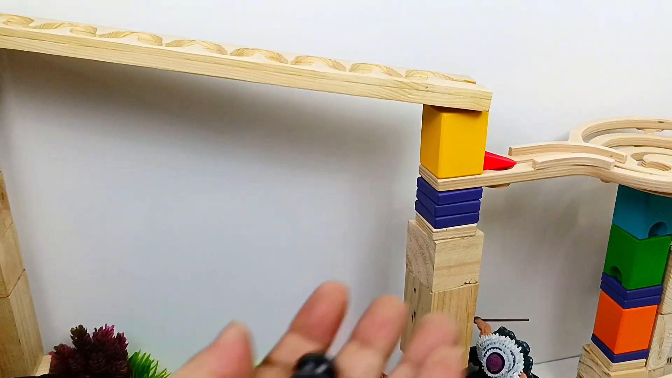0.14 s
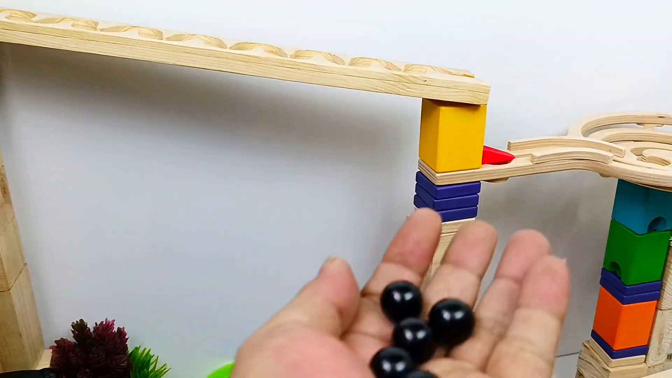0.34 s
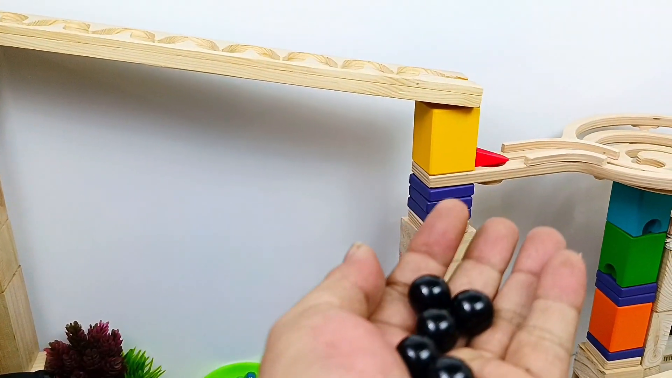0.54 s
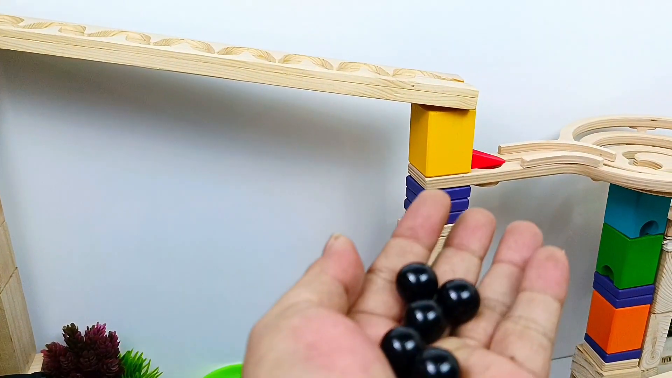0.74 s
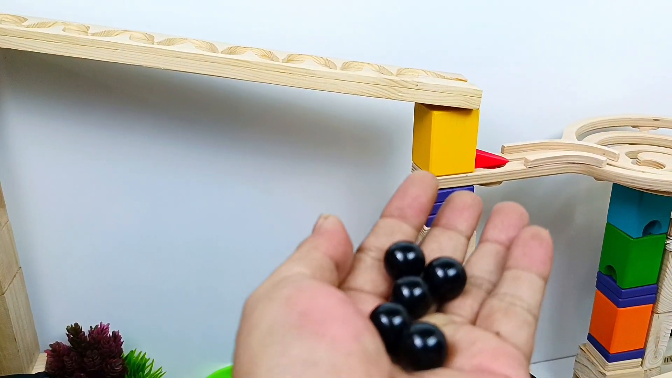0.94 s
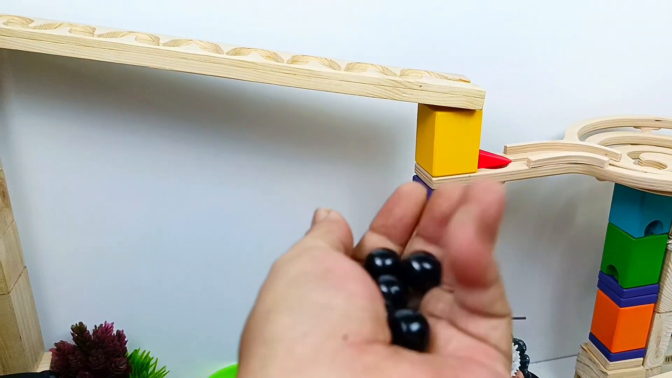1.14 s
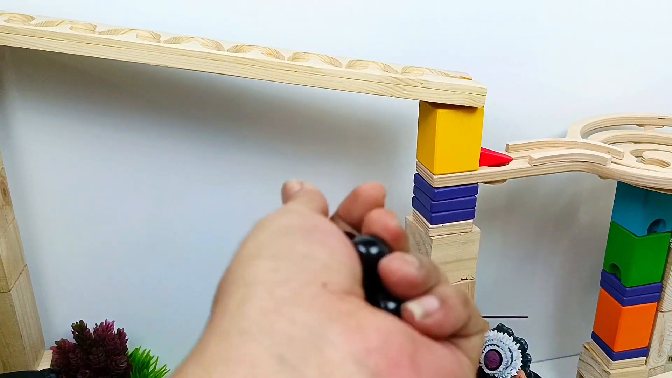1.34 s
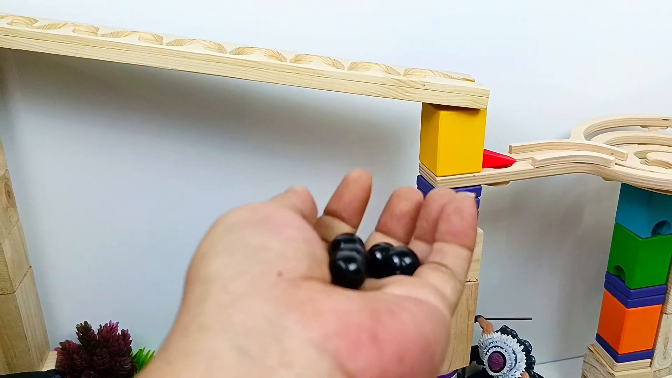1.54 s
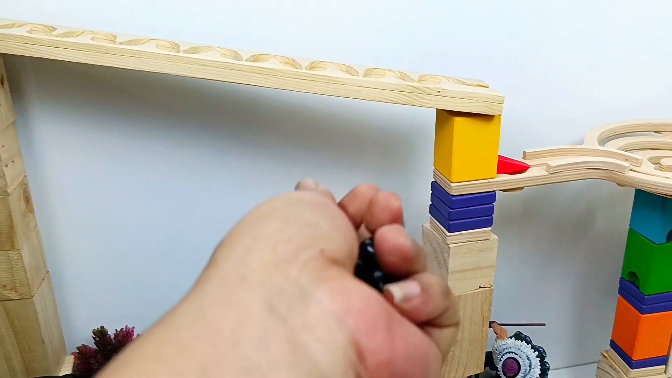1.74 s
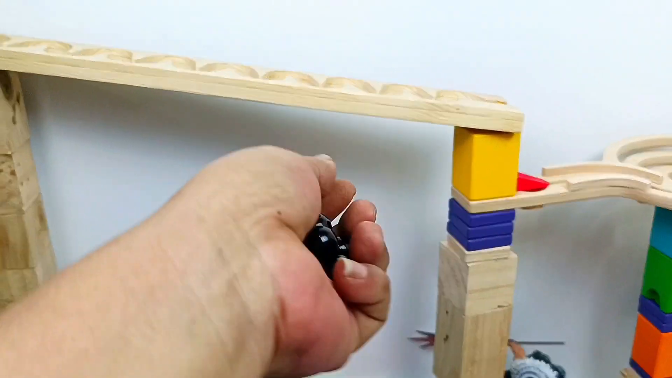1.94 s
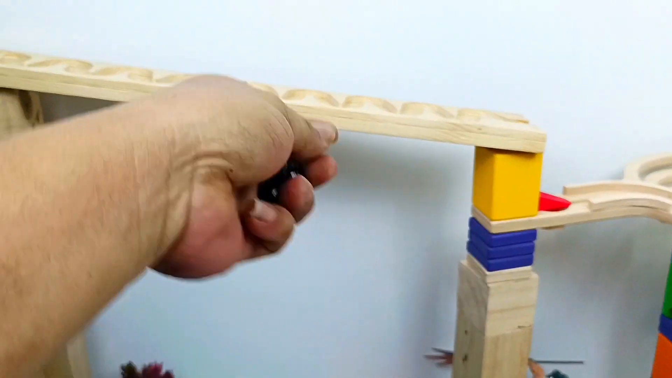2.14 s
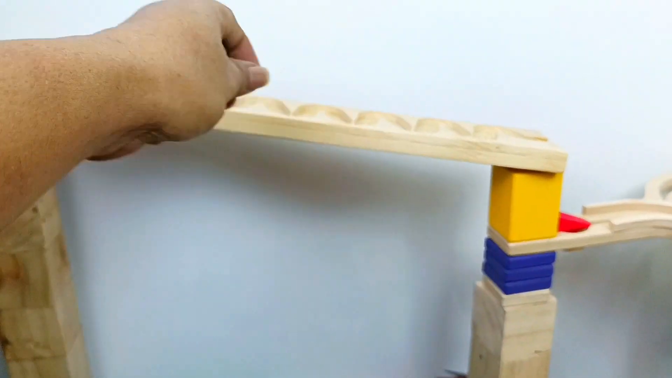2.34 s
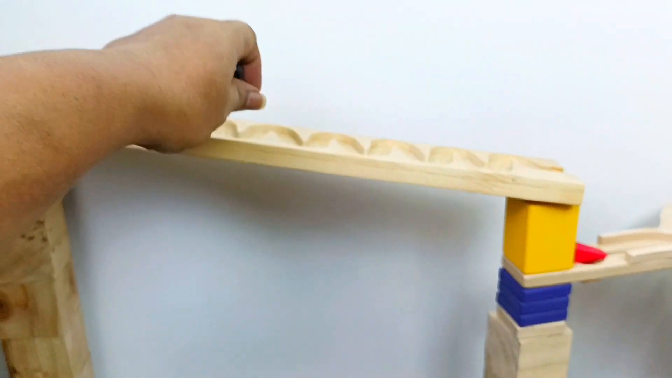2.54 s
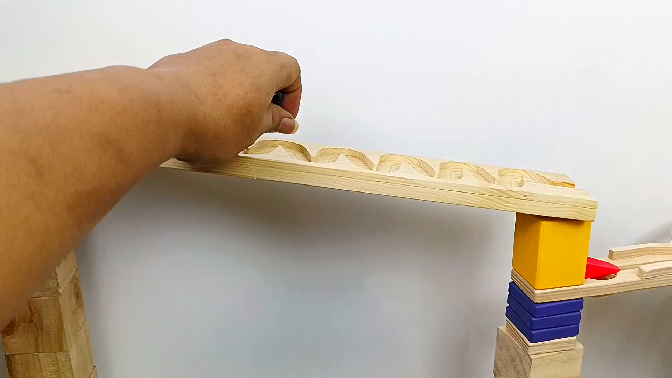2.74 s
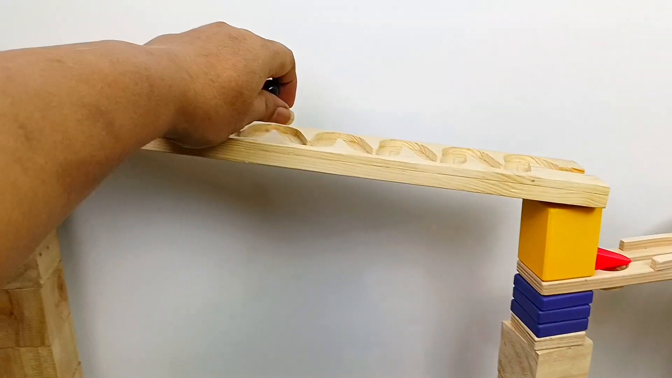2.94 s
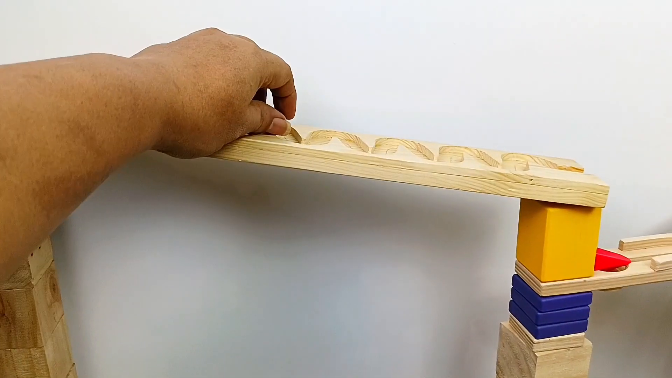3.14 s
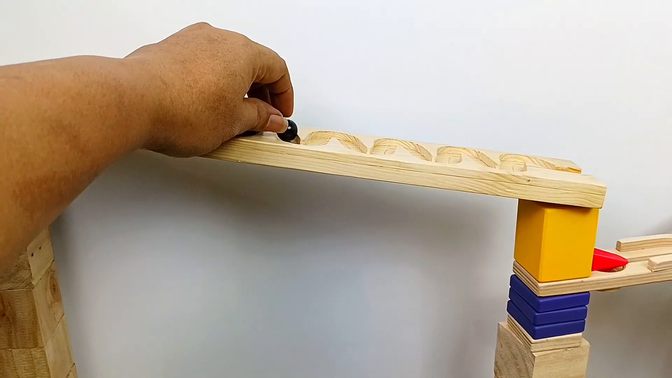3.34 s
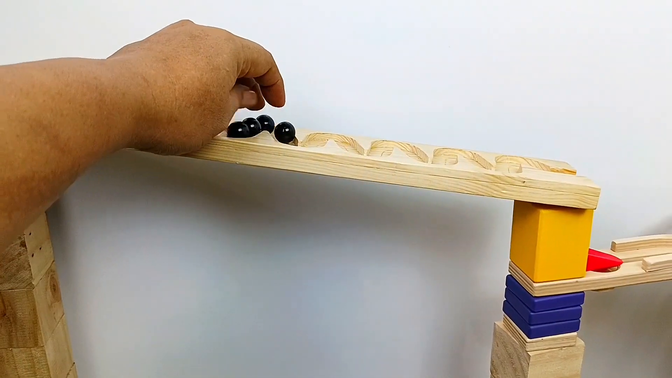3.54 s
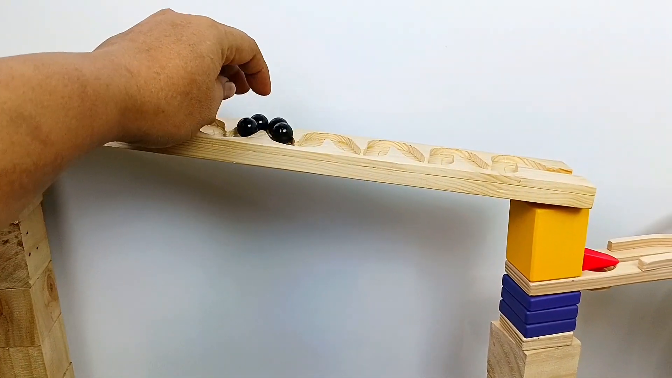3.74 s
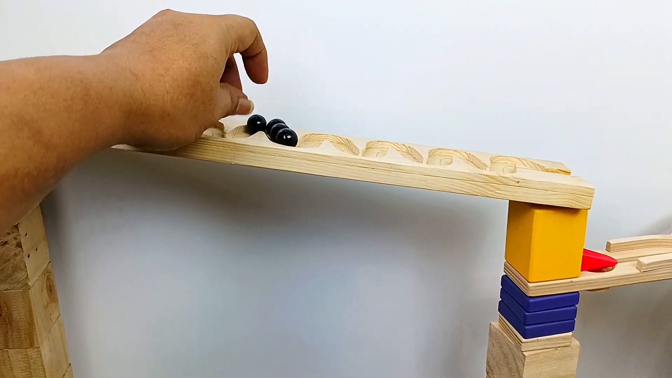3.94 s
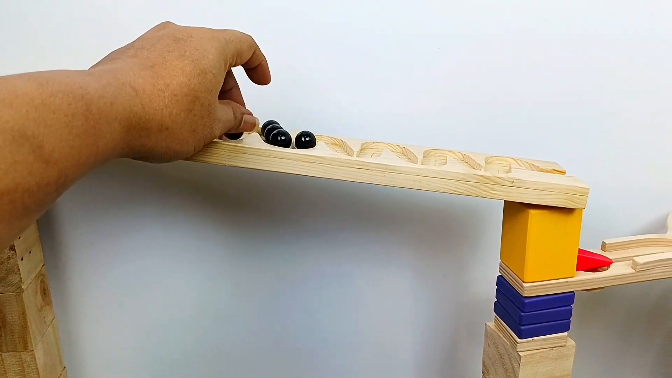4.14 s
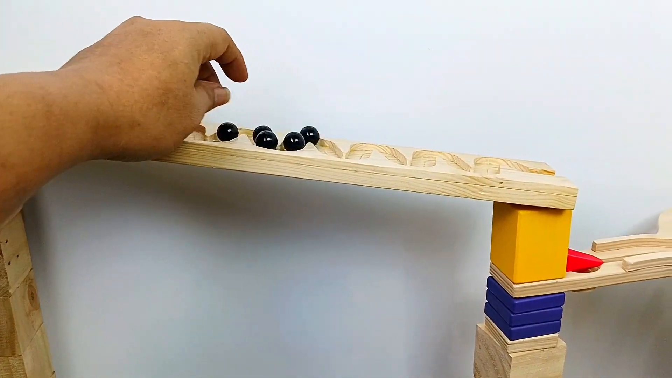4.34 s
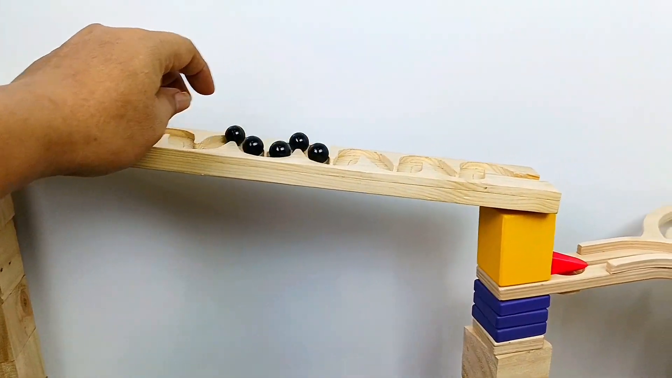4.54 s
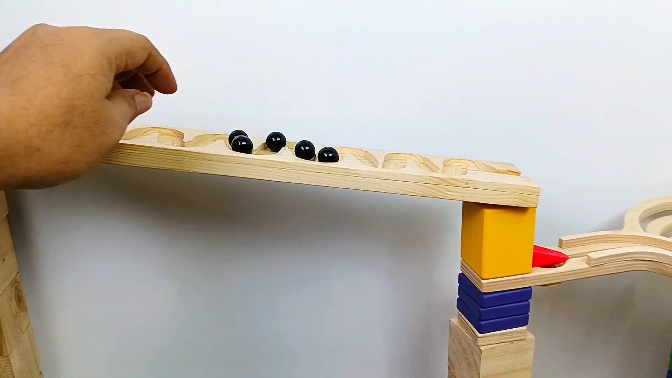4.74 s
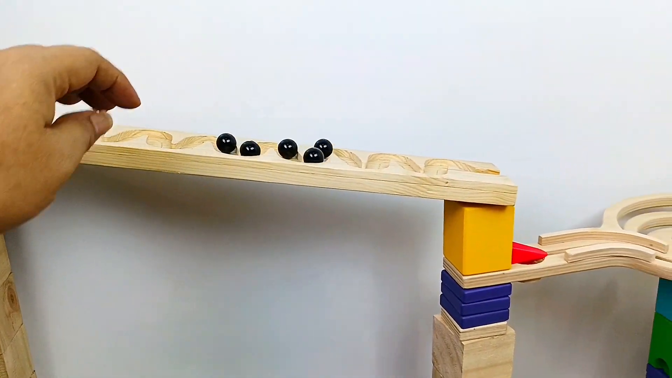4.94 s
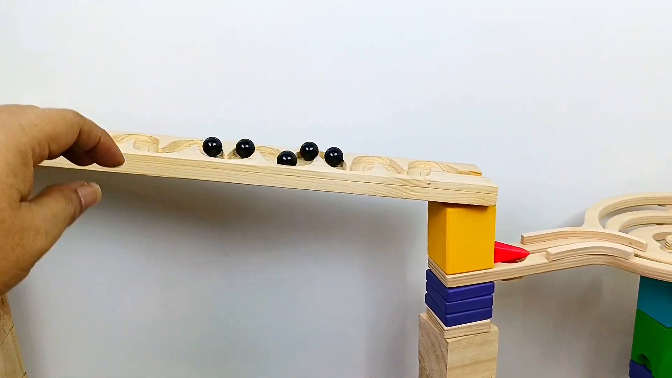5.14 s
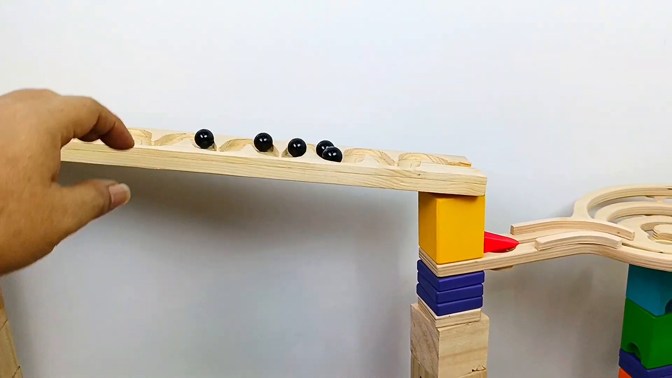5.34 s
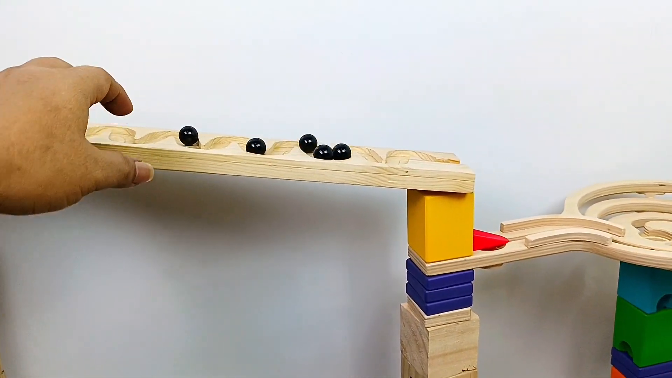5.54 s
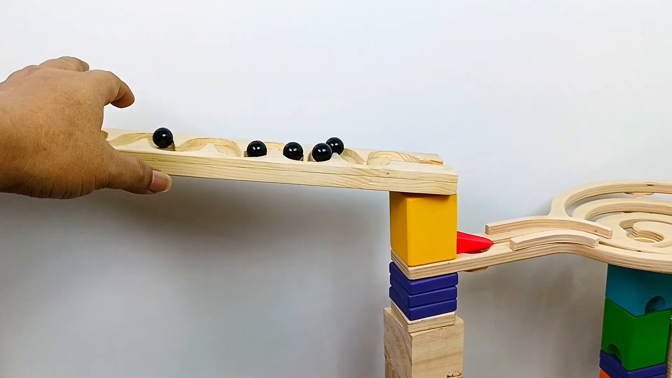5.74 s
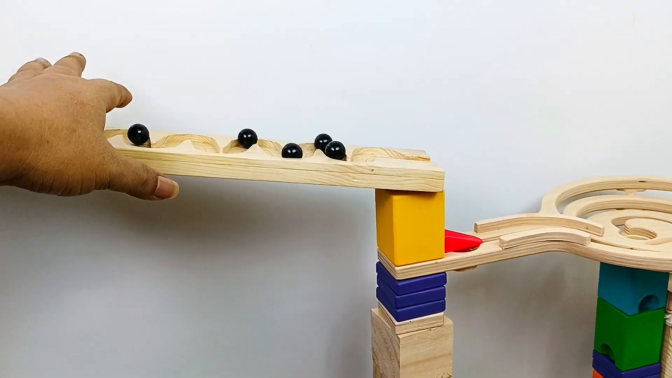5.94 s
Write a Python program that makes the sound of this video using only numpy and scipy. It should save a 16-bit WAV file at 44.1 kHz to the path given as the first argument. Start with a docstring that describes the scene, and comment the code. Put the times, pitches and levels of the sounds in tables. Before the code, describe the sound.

Glass marbles click together in a hand, then clatter onto a wooden ramp and roll slowly down with light knocks.

```python
"""Glass marbles click together in a hand, close by, in a small live room. They are dropped on a wavy
wooden ramp, clatter, and roll slowly down from dip to dip, knocking on the wood and now and then on
each other. A few soft low bumps come near the end. Glass on glass gives a brief bright pulse, coloured
by the hollow around the marbles; glass on wood excites the damped modes of the plank, strongly in a
knock and faintly in rolling. Quiet room noise and a hum lie underneath."""
import sys
import numpy as np
from scipy import signal
from scipy.fft import rfft, irfft
from scipy.io import wavfile
from scipy.ndimage import uniform_filter1d

SR = 44100
rng = np.random.default_rng(int(sys.argv[2]) if len(sys.argv) > 2 else 0)


def transcribe(signal):
    """Save signal, clipped to [-1, 1], as a 16-bit WAV file at the path in sys.argv[1]."""
    frames = np.atleast_2d(signal).T
    limited = np.clip(frames, -1, 1)
    pcm = np.round(limited * 32767).astype(np.int16)
    wavfile.write(sys.argv[1], SR, pcm)


N = 263718
T = np.arange(N) / SR
FFT_SIZE = 4096
HZ = np.fft.rfftfreq(FFT_SIZE, 1 / SR)

# A marble drops into a dip and hops once. Each row: start in seconds, relative level in dB,
# brightness in dB per octave, level of the second landing in dB against the first.
DROPS = [(3.1640, -18.5, 2.5, 0), (3.1965, -21, -2, -3), (3.2383, -19.5, 2, -7.5), (3.2798, -19, 0, -11),
         (3.3175, -23, 1, -5), (3.3805, -22, -3, -19), (3.4255, -25, -1, -3), (3.4759, -20.5, -1, -13),
         (3.5322, -21.5, 3, -4), (3.57, -25.5, -2.5, -0.5), (3.7485, -26.5, 0, -9), (3.9398, -43, -6.5, -4),
         (4.2692, -26.5, 3.5, 2.5), (4.318, -30, 2.5, -7.5), (4.358, -32.5, 2.5, -9), (4.3973, -37, 9, -3),
         (4.5674, -36, 4, -9), (4.6745, -39.5, -1.5, 8), (4.953, -39.5, 13, -2.5), (5.076, -38.5, 5.5, -8),
         (5.2279, -41, 6.5, -11), (5.323, -34, 5, -11.5), (5.422, -43, 12.5, -10), (5.4794, -40.5, 3, -17),
         (5.598, -44.5, 5, 12), (5.8135, -44, 6, -8.5), (5.9243, -46, 4, -15)]
# The fingers close round the marbles, then leave them on the ramp. Each row: time in seconds,
# resonance of the hollow in Hz, its extra strength in dB, share sent into the room in dB.
HOLLOW = [(0, 4280, 0, -11.5), (.52, 4580, 3.5, -10.5), (1.36, 4300, 6, -20), (1.40, 2970, 3, -14),
          (1.49, 3780, 5.5, -3.5), (1.76, 3770, 4, -9.5), (2.12, 4140, 5.5, -6.5), (3.2, 4650, 0, -6),
          (4.85, 5330, -10, -8.5)]


def amp(db):
    """Decibels to amplitude ratio."""
    return 10 ** (np.asarray(db) / 20)


def unit_energy(x):
    """Normalisation to an energy of 1."""
    return x / np.sqrt(np.sum(x ** 2) + 1e-20)


def unit_rms(x):
    """Normalisation to an rms of 1."""
    return x / np.sqrt(np.mean(x ** 2) + 1e-20)


def curve_at(points, hz):
    """Interpolation on a logarithmic frequency axis."""
    point_hz, value = np.transpose(points)
    return np.interp(np.log(hz + 1), np.log(point_hz + 1), value)


def above(hz, order):
    """A high-pass shape: a smooth step from 0 to 1 around hz."""
    return 1 - 1 / (1 + (HZ / hz) ** order)


def add(mix, start_s, sound):
    """Superposition: a sound joins the mix at its start time."""
    part = mix[max(round(start_s * SR), 0):][:len(sound)]
    part += sound[:len(part)]


def minimum_phase(db):
    """Minimum phase gives the sharpest causal pulse with this spectrum, here of energy 1."""
    cepstrum = irfft(np.log(amp(np.maximum(db, -100))))
    cepstrum[1:FFT_SIZE // 2] *= 2
    cepstrum[FFT_SIZE // 2 + 1:] = 0
    return unit_energy(irfft(np.exp(rfft(cepstrum))))


def diffuse_burst(t60, rise_s):
    """Incoherent summation: countless tiny contacts and echoes merge into noise that swells and dies."""
    t = T[:FFT_SIZE * 2]
    return unit_energy(rng.standard_normal(len(t)) * amp(-60 * t / t60) * (1 - np.exp(-t / rise_s)))


def room_noise(side_db=-12, patchy_db=2):
    """Spectrally shaped noise: a steady background that drifts a little in patches of time and pitch."""
    # Each row: frequency in Hz, relative level in dB.
    spectrum = [(30, -45), (55, -15.5), (76, -15), (97, -12.5), (125, -16.5), (160, -15), (200, -10),
                (420, -9), (560, -12), (1100, -14.5), (1500, -7.5), (2300, -10.5), (3700, -24.5),
                (5600, -35.5), (8000, -34), (10500, -42.5), (13000, -46), (16000, -48)]
    # Each row: time in seconds, relative level in dB.
    levels = [(0, -59), (.7, -62), (1.3, -60.5), (1.8, -62.5), (2.03, -60.5), (2.15, -62.5), (2.4, -58.5),
              (2.8, -59), (3.1, -61.5)]
    hz = np.fft.rfftfreq(1024, 1 / SR)
    shape = (2, N // 256 + 5, len(hz))
    bins = rng.standard_normal(shape) + 1j * rng.standard_normal(shape)
    drift = uniform_filter1d(rng.standard_normal(shape[1:]), size=12, axis=0)
    patches = unit_rms(uniform_filter1d(drift, size=10, axis=1))
    bins *= amp(curve_at(spectrum, hz) + patchy_db * patches)
    mid, side = signal.istft(bins.transpose(0, 2, 1), nperseg=1024, noverlap=768)[1][:, :N]
    gain = amp(np.interp(T, *np.transpose(levels)) + 2.5)
    return gain * (unit_rms(mid) + amp(side_db) * unit_rms(side) * np.array([[1], [-1]]))


def hum(waver=.4):
    """Slow random amplitude modulation makes a few faint low tones waver."""
    # Each row: frequency in Hz, level in dB.
    tones = [(53, -83), (98, -75.5), (157, -77)]
    drifts = unit_rms(uniform_filter1d(rng.standard_normal((len(tones), N)), size=6000, axis=1))
    return sum(amp(db) * np.sin(2 * np.pi * (hz * T + rng.random())) * (1 + waver * drift)
               for (hz, db), drift in zip(tones, drifts))


def reverberation(x, gap_s=0.0008, side_db=-8):
    """Dense wall echoes decay exponentially, each band at its own rate, much alike left and right."""
    # Each row: frequency in Hz, time to fall 60 dB in seconds.
    decay_times = [(150, .6), (1000, 1), (3500, 0.84), (8000, 0.73), (11000, 0.48), (15000, 0.67)]
    hz, t, bins = signal.stft(rng.standard_normal((2, SR)), SR, nperseg=256)
    bins = bins * amp(-60 * t / curve_at(decay_times, hz)[:, None])
    onset = np.clip(T[:SR] / gap_s - 1, 0, 1)
    mid, side = signal.istft(bins, SR, nperseg=256)[1][:, :SR] * onset
    tails = unit_energy(mid) + amp(side_db) * unit_energy(side) * np.array([[1], [-1]])
    return signal.fftconvolve(x[None], tails, axes=1)[:, :N]


def bumps():
    """Heavily damped vibration: a soft blow gives brief uneven swings, a little different in each ear."""
    # Thuds of the hand and hollow tocks of the plank.
    # Each row: start in seconds, level in dB, pitch in Hz, length in seconds.
    blows = [(0.024, -63, 79, 0.16), (1.508, -66, 65.4, 0.034), (2.87, -52, 423, 0.071),
             (3.377, -31.5, 820, 0.021), (3.821, -62, 62, 0.14), (4.685, -40.5, 1792, 0.029),
             (4.688, -57.5, 220, .04), (5.641, -43.5, 94, .045), (5.773, -41, 59.7, 0.053),
             (5.848, -53.5, 60.5, 0.061), (5.909, -60, 94.7, 0.091)]
    out = np.zeros((2, N))
    for start, db, hz, length in blows:
        t = T[:round(length * SR)]
        band = signal.butter(2, [hz / 2, 2 * hz], "bandpass", fs=SR, output="sos")
        for channel in out:
            rumble = signal.sosfilt(band, rng.standard_normal(SR))[-len(t):]
            swings = np.sin(2 * np.pi * hz * t) + .3 * unit_rms(rumble)
            add(channel, start, amp(db) * signal.windows.tukey(len(t), .5) * swings)
    return out


def ramp_ring(tilt_db, spread_db, t60_s=0.17, damping=0.2):
    """Modal decay: the ramp's high modes die sooner; random shares stand for where the marble lands."""
    # Each row: frequency in Hz, relative level in dB.
    modes = [(157, -17), (383, -10), (415, -6), (460, -8), (813, -9), (1061, -12), (1237, -6), (1276, -4),
             (1365, 2), (1403, -8), (1789, -4), (1868, -9), (1978, -4), (2025, -2), (2053, -3), (2081, -3),
             (2118, -5), (2273, -4), (2346, -4), (2488, -8), (2701, -4), (2838, -1), (2891, -2), (2934, -2),
             (2966, -3), (3585, -7), (3860, -7), (4600, -14), (4840, -17), (5450, -22)]
    hz, db = np.transpose(modes)[:, :, None]
    t = T[:SR // 2]
    db = db + tilt_db * np.log2(hz / 2000) + spread_db * rng.standard_normal(hz.shape)
    t60 = t60_s * (2000 / hz) ** damping
    phase = 2 * np.pi * (hz * t + rng.random(hz.shape))
    return unit_energy((amp(db - 60 * t / t60) * np.sin(phase)).sum(0))


def dip_ring(tilt_db, spread_db=4.5, t60_s=0.12, rise_s=0.0024, detune=.012):
    """Resonance of a carved dip: brief pitches, in random shares that stand for where it is struck."""
    # Each row: frequency in Hz, relative level in dB.
    modes = [(375, -5), (1280, 1.5), (1800, 1), (2480, 1.5), (2825, 2), (2966, -3), (3580, -6), (3860, -9),
             (4600, -13), (4980, -26), (5500, -20.5)]
    hz, db = np.transpose(modes)[:, :, None]
    t = T[:FFT_SIZE * 2]
    db = db + tilt_db * np.log2(np.maximum(hz, 800) / 2000) + spread_db * rng.standard_normal(hz.shape)
    detuned_hz = hz * (1 + detune * rng.standard_normal(hz.shape))
    phase = 2 * np.pi * (detuned_hz * t + rng.random(hz.shape))
    envelope = amp(-60 * t / t60_s) * (1 - np.exp(-t / rise_s))
    return unit_energy((amp(db) * np.sin(phase)).sum(0) * envelope)


def rolling(grain_db=6.5, blows_per_s=500, ring_db=-1.0, lurch_db=3, surge_db=3, surge_s=0.073):
    """Roughness excitation: wood grain gives the rolling marbles tiny blows, stronger after each drop."""
    # The wood's response to rolling. Each row: frequency in Hz, relative level in dB.
    spectrum = [(100, -19.5), (350, 5), (480, -11.5), (700, 0.5), (900, -5), (1130, -10), (1300, 9.5),
                (1600, -7.5), (2050, 12), (2650, -9.5), (2950, -3.5), (3250, -29), (3850, -25.5),
                (4150, -30), (6000, -56), (15000, -52)]
    # Loud as the marbles pour from the hand, then a slow roll.
    # Each row: time in seconds, relative level in dB.
    levels = [(3.169, -45), (3.58, -46), (3.7, -56.5), (3.85, -53), (4.2, -66), (4.4, -56.5), (4.95, -59.5),
              (5.18, -57), (5.46, -60), (5.56, -63.5), (5.98, -59)]
    sizes = amp(grain_db * np.minimum(rng.exponential(1, N), 2)) * rng.choice([-1, 1], N)
    lurch = np.tanh(unit_rms(uniform_filter1d(rng.standard_normal(N), size=900)))
    blows = sizes * (rng.random(N) < blows_per_s / SR) * amp(lurch_db * lurch)
    drop_times = np.sort(np.transpose(DROPS)[0])
    since_drop = abs(T - drop_times[np.maximum(np.searchsorted(drop_times, T) - 1, 0)])
    surge = surge_db * (np.exp(-since_drop / surge_s) - 0.6)
    times, db = np.transpose(levels)
    force = unit_rms(blows) * amp(np.interp(T, times, db) + surge) * (T > times[0])
    body = minimum_phase(curve_at(spectrum, HZ))
    out = signal.oaconvolve(force, body)[:N]
    stretches, crossing_s = 5, .16  # each stretch of wood rings differently
    stretch = (T // crossing_s).astype(int) % stretches
    for k in range(stretches):
        ring = unit_energy(signal.fftconvolve(body, ramp_ring(tilt_db=-3, spread_db=4.5)))
        out += amp(ring_db) * signal.oaconvolve(force * (stretch == k), ring)[:N]
    return out


def landings(hop_s=.0218, first_bass_db=-0.5, second_bass_db=-4):
    """Elastic rebound: each drop lands twice, the second clack with less bass."""
    first = [(start, db, tilt_db, first_bass_db) for start, db, tilt_db, _ in DROPS]
    second = [(start + hop_s, db + hop_db, tilt_db, second_bass_db)
              for start, db, tilt_db, hop_db in DROPS]
    return first + second


def knocks(clack_db=15.0, dip_db=9.5, ring_db=10, rise_s=0.0013):
    """Impact excitation: a marble rattles on the plank in a dense clack and sets dip and ramp ringing."""
    # The clack of the wood. Each row: frequency in Hz, relative level in dB.
    spectrum = [(100, -35.5), (250, -12), (430, -3), (600, -7), (820, -1), (1350, -5.5), (1600, -2.5),
                (2050, 0), (2500, -4.5), (2900, 5.5), (3250, -12), (3800, -5), (4250, -18.5), (4700, -11),
                (5400, -28), (7500, -26.5), (15000, -50.5)]
    full_knock_db, clack_slope = -21.5, 0.23  # knocks gentler than a drop from the hand are more ring
    out = np.zeros(N)
    for start, db, tilt_db, bass_db in landings():
        tilt = tilt_db * np.log2(np.maximum(HZ, 800) / 2000) * (1 - above(hz=6360, order=8))
        bass = bass_db * (1 - above(hz=1030, order=6))
        pulse = minimum_phase(curve_at(spectrum, HZ) + tilt + bass)
        clack = unit_energy(signal.fftconvolve(pulse, diffuse_burst(t60=0.054, rise_s=rise_s)))
        add(out, start, amp(db + clack_db - clack_slope * (full_knock_db - db)) * clack)
        add(out, start, amp(db + dip_db) * dip_ring(tilt_db))
        ring = ramp_ring(tilt_db, spread_db=4.0)
        add(out, start, amp(db + ring_db) * ring * (1 - np.exp(-T[:len(ring)] / rise_s)))
    return out


def near_echoes(t60=0.039, scatter_db=-2.0, palm_s=.00027, palm_db=-7):
    """Early reflections: the direct impulse is followed by echoes off the palm and nearby surfaces."""
    echoes = amp(scatter_db) * diffuse_burst(t60, rise_s=0.000357)
    echoes[0] += 1
    echoes[round(palm_s * SR)] += amp(palm_db)
    return echoes


def glass_pulse(start, top_db, peak_db=6, peak_width_hz=560, notch_db=1.5, notch_width_hz=700):
    """Cavity resonance: the hollow round the marbles gives a contact a peak, with little sound below."""
    # Glass striking glass. Each row: frequency in Hz, relative level in dB.
    spectrum = [(300, -23.5), (2000, -8.5), (4200, -9), (5400, -4), (6700, -2), (8100, 2), (9300, -4.5),
                (11000, -16.5), (12500, -17.5), (15000, -21.5)]
    times, hollow_hz, hollow_db, _ = np.transpose(HOLLOW)
    hz, extra_db = np.interp(start, times, hollow_hz), np.interp(start, times, hollow_db)
    peak = (peak_db + extra_db) / (1 + ((HZ - hz) / peak_width_hz) ** 2)
    notch = notch_db * np.clip(extra_db / 2, 0, 1) / (1 + ((HZ - 1.88 * hz) / notch_width_hz) ** 2)
    top = top_db * above(hz=9500, order=12)
    low_cut = 20 * (1 - above(hz=0.65 * hz, order=14))
    return minimum_phase(curve_at(spectrum, HZ) + peak - notch + top - low_cut)


def bounce_run(start, db, gap_s, loss_db, top_db, count=8, gap_ratio=.96):
    """Inelastic collisions: each bounce comes a little sooner and is weaker than the last."""
    gaps = gap_s * gap_ratio ** np.arange(count - 1)
    times = start + np.concatenate([[0], np.cumsum(gaps)])
    return [(time, db - loss_db * k, top_db) for k, time in enumerate(times)]


def clicks(uneven_db=3, contacts_per_s=2200):
    """Hard contact radiates a sharp pulse: marbles click singly, bounce, and chatter as they rub."""
    # Single collisions. Each row: start in seconds, relative level in dB, gain above 9.5 kHz in dB.
    singles = [(.0018, -11, 4), (.0123, -10, 2), (.026, -5, 4), (.0357, -7.5, -1), (.0453, -13, -4.5),
               (.5218, -21, 4), (.5509, -28, -2), (1.3658, -32.5, -21), (1.4925, -29, 1), (1.6376, -37, -2),
               (1.6414, -19, 15), (1.6663, -28, 9), (1.701, -23.5, -2), (1.7596, -20, 6),
               (1.904, -32.5, -6), (2.0649, -33.5, 17), (2.118, -24.5, 5), (3.1898, -29, 13),
               (3.2856, -29.5, 11), (3.41, -31, 5), (3.44, -33, 9), (3.7822, -36.5, -10),
               (3.8366, -20.5, 7.5), (3.963, -29, 5), (4.139, -37, 5), (4.288, -32, 5.5), (4.8427, -28, 5)]
    # Two marbles bounce to rest against each other. Each row: start in seconds, first relative level
    # in dB, first gap in seconds, loss per bounce in dB, gain above 9.5 kHz in dB.
    bounces = [(0.05, -14.5, 0.0085, 4.2, 4), (0.4306, -27, 0.0094, 5.5, 3), (0.4989, -30.5, 0.0058, 2, 0),
               (0.5272, -24.5, .003, 5, 0), (0.6005, -30, 0.013, 8, 9.5), (1.3972, -21, .0028, 3.5, 9),
               (1.571, -39, .003, 4, 2), (1.7137, -20.5, .0073, 2.5, 0), (1.7353, -20, .007, 5, 3),
               (1.7492, -18, .0104, 3, 3), (1.823, -26, 0.0037, 3.5, -4), (2.0821, -33.5, 0.0039, 2.5, -7)]
    # Marbles pressed together. Each row: start in seconds, length in seconds, level in dB,
    # gain above 9.5 kHz in dB.
    chatters = [(1.3, 0.064, -67, -18), (1.358, 0.029, -56, -11), (1.4, 0.11, -47.5, 9.5),
                (1.569, .0134, -52, -1), (1.715, 0.089, -39.5, 2), (3.104, 0.019, -59, 5),
                (3.841, 0.12, -63, -0.5), (4.838, 0.1, -55.5, -2)]
    out = np.zeros(N)
    rebounds = [hit for run in bounces for hit in bounce_run(*run)]
    for start, db, top_db in list(singles) + rebounds:
        add(out, start, amp(db + 5.0) * signal.fftconvolve(glass_pulse(start, top_db), near_echoes()))
    for start, length, db, top_db in chatters:
        n = round(length * SR)
        contacts = (rng.random(n) < contacts_per_s / SR) * rng.choice([-1, 1], n)
        strengths = amp(uneven_db * rng.standard_normal(n))
        chatter = unit_rms(contacts * strengths) * signal.windows.tukey(n, .5)
        add(out, start, amp(db) * signal.fftconvolve(chatter, glass_pulse(start, top_db)))
    return out


def scene():
    """Direct and reverberant sound add over noise and hum; marbles farther off sound more reverberant."""
    glass = clicks()
    wood = knocks() + rolling()
    times, _, _, room_db = np.transpose(HOLLOW)
    echoes = reverberation(amp(np.interp(T, times, room_db)) * glass + amp(-5.5) * wood)
    return glass + wood + bumps() + echoes + room_noise() + hum()


def record(dry, low_cut_hz=42, high_cut_hz=16100):
    """Band limiting: filters shed the deepest bass and the highest treble."""
    thinned = signal.sosfilt(signal.butter(4, low_cut_hz, "highpass", fs=SR, output="sos"), dry)
    low_pass = signal.firwin(255, high_cut_hz, window=("kaiser", 9), fs=SR)
    return signal.oaconvolve(thinned, low_pass[None], "same")


dry = scene()
out = record(dry)
transcribe(out)
```